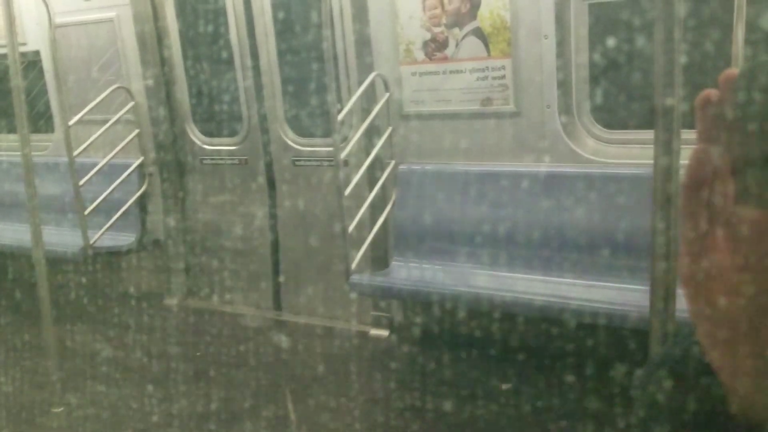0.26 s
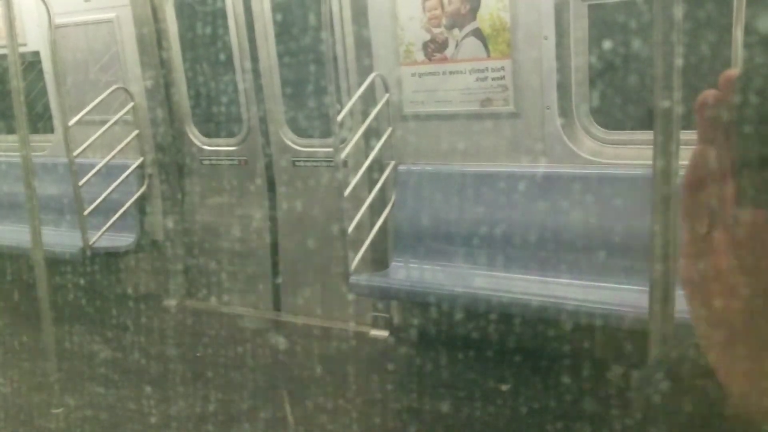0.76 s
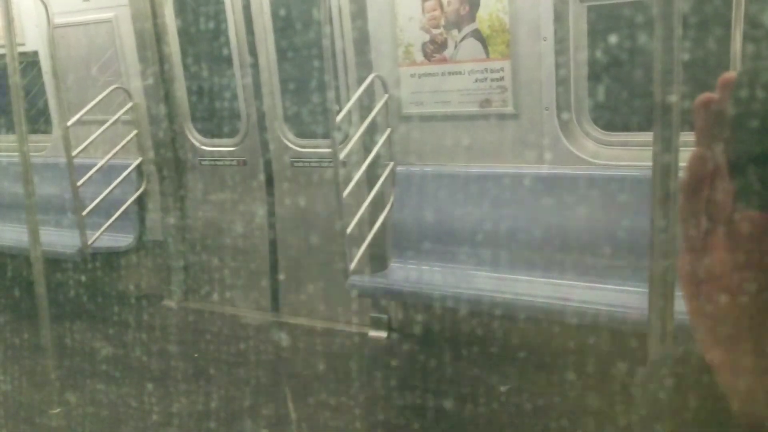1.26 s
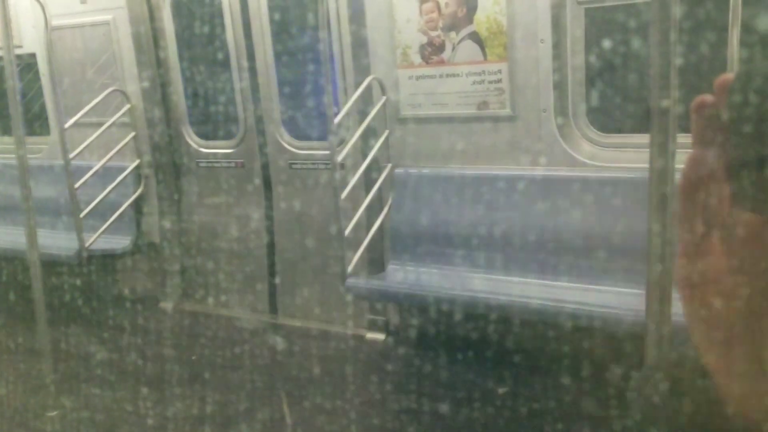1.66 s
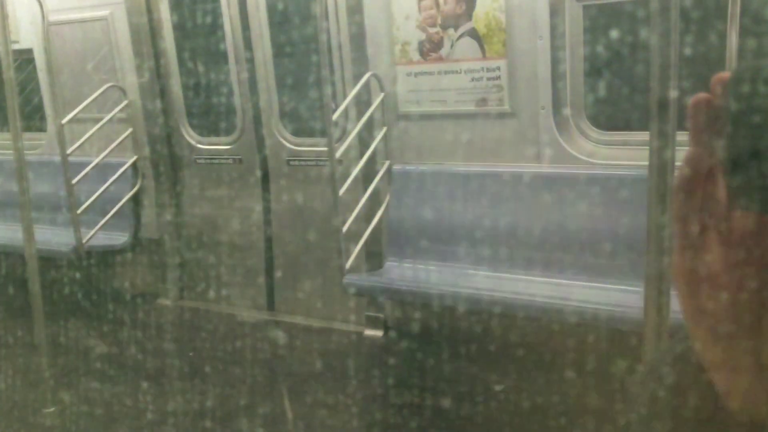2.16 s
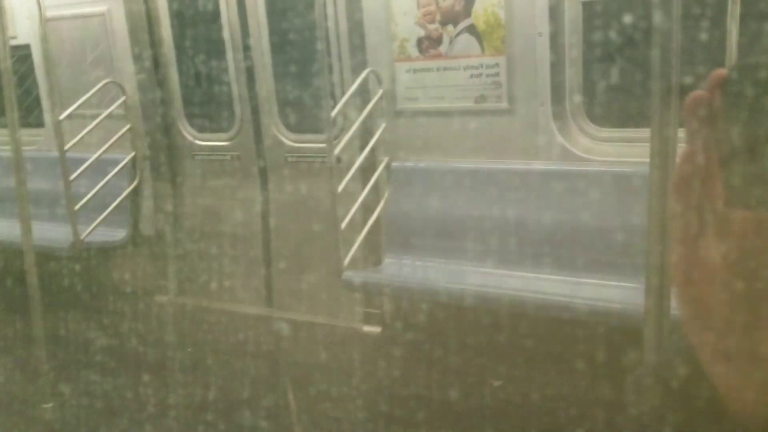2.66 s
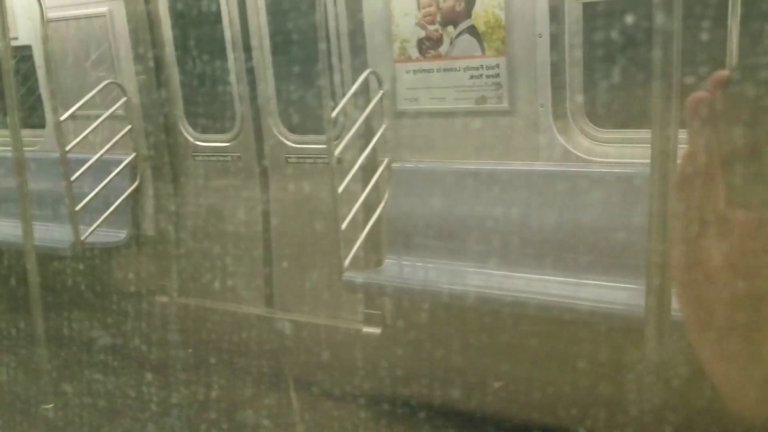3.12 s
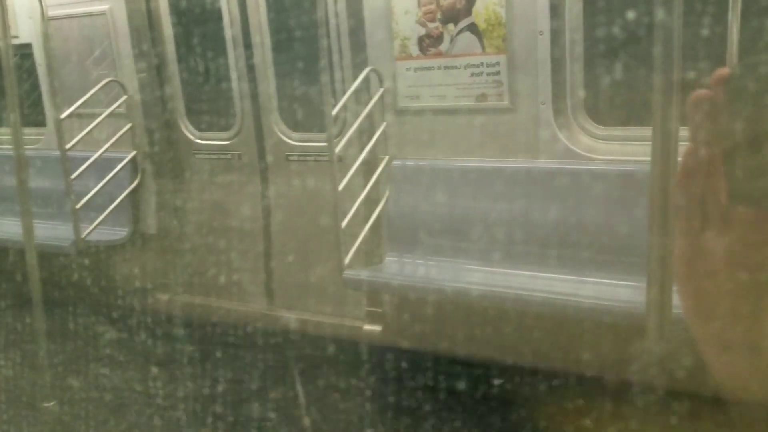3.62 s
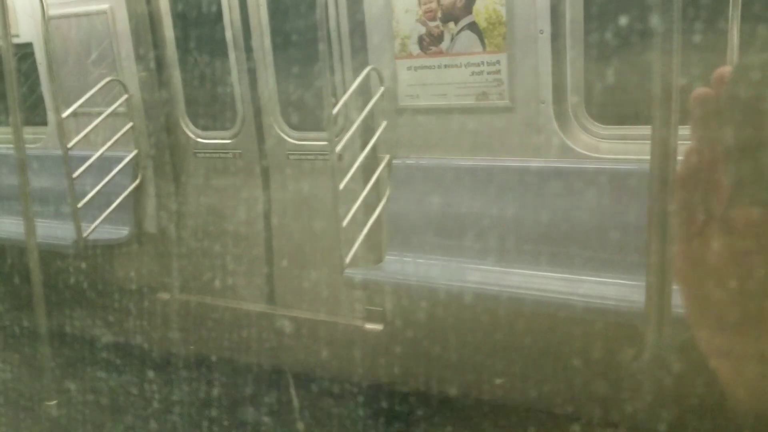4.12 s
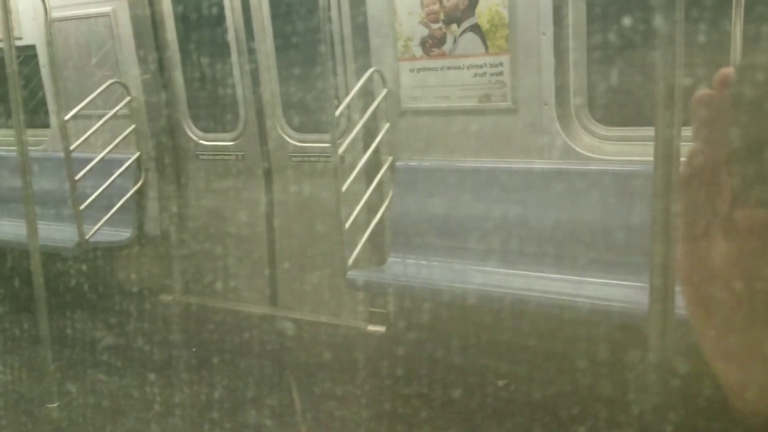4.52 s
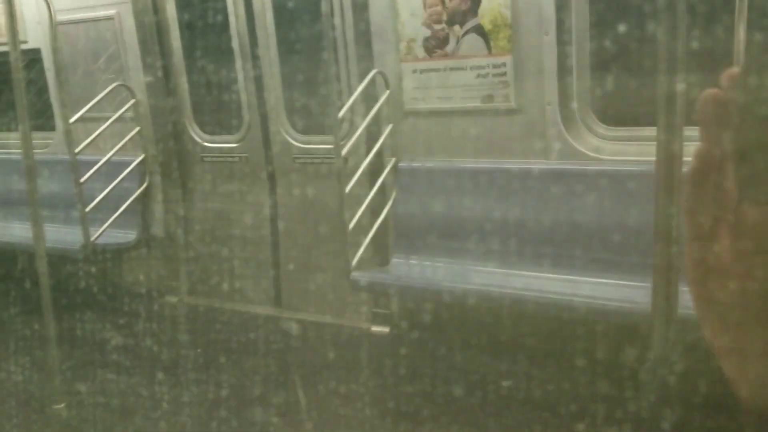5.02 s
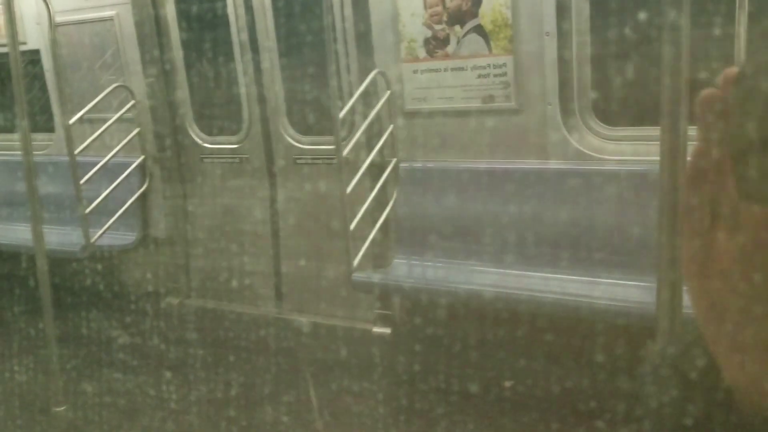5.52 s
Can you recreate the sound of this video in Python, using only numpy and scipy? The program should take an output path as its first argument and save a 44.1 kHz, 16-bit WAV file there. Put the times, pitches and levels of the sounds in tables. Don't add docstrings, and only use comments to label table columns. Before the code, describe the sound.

Continuous subway ride heard from within the cabin: bassy, uneven booming, grainy rolling noise and a low electric hum coming in short surges. Low jolts shake the car, the strongest near 2.4 and 3.8 seconds, the latter with a tight metallic clatter. Very faint, very high wheel squeaks touch the right side only. Wide stereo in the treble, bass centred, left side duller.

```python
import sys
import numpy as np
from scipy import signal
from scipy.fft import rfft, irfft
from scipy.io import wavfile
from scipy.ndimage import uniform_filter1d

SR = 44100
rng = np.random.default_rng(int(sys.argv[2]) if len(sys.argv) > 2 else 0)


def dump_mix(stems):
    frames = np.atleast_2d(stems).T
    limited = np.clip(frames, -1, 1)
    pcm = np.round(limited * 32767).astype(np.int16)
    wavfile.write(sys.argv[1], SR, pcm)


def voltage_ratio(level):
    return 10 ** (np.asarray(level, float) / 20)


N = 254898


def evened(x):
    return x / np.sqrt(np.mean(np.atleast_2d(x).mean(0) ** 2) + 1e-20)


def read(points, hz):
    f, value = np.transpose(points)
    return np.interp(np.log(hz + 1), np.log(f + 1), value)


def curve(points):
    times, values = np.transpose(points)
    return np.interp(np.arange(N) / SR, times, values)


def add(mix, s, sound):
    part = mix[..., round(s * SR):][..., :sound.shape[-1]]
    part += sound[..., :part.shape[-1]]


def resonate(x, hz, width_hz):
    turn = np.exp(2j * np.pi * np.cumsum(hz * np.ones(x.shape[-1])) / SR)
    r = np.exp(-np.pi * width_hz / SR)
    return 2 * (turn * signal.lfilter([1 - r], [1, -r], x / turn)).real


def drift(top_hz):
    t = np.arange(0, N, 256) / SR
    slow = np.zeros(len(t))
    for f in np.geomspace(.2, top_hz, num=20):
        slow += np.sin(2 * np.pi * (f * t + rng.random())) / np.sqrt(f)
    return np.interp(np.arange(N) / SR, t, evened(slow))


def struck(t, rise_s, t60_s):
    rise = np.sin(np.pi / 2 * np.clip(t / max(rise_s, 1e-4), 0, 1)) ** 2
    return rise * voltage_ratio(-60 * np.maximum(t - rise_s, 0) / t60_s)


def steadied(x, width_s):
    size = round(width_s * SR)
    swell = uniform_filter1d(uniform_filter1d(x.mean(0) ** 2, size), size)
    return evened(x / np.sqrt(swell + 0.071))


def ports(size):
    # (frequency [Hz], likeness [0-1])
    likeness = [(25, 0.88), (60, 1), (250, 0.94), (450, 0.83), (680, 0.52), (820, 0.4), (1100, 0.2),
                (1600, 0.19), (2200, 0.09), (2750, .45), (3500, 0), (5000, 0.02), (7000, 0.15)]
    # (frequency [Hz], lead [rad])
    phase_lead = [(0, 0), (900, -.9), (1400, -3.2), (2300, -3.6), (2600, -6.8), (3500, -8.4), (7000, -17)]
    hz = np.fft.rfftfreq(size, 1 / SR)
    a, b, c, d = rng.standard_normal((N // (size // 4) + 5, len(hz), 4)).T
    same = np.clip(read(likeness, hz), 0, 1)[:, None]
    turn = np.exp(1j * np.interp(hz, *np.transpose(phase_lead)))[:, None]
    right = a + 1j * b
    left = same * turn * right + np.sqrt(1 - same ** 2) * (c + 1j * d)
    return hz, np.array([left, right])


def rolling(lo_hz, hi_hz, size, patchy_db):
    # (frequency [Hz], density [dB per Hz])
    rail_colour = [(18, -17.5), (32, -4), (100, -2.5), (260, -4.5), (350, -11), (560, -12), (720, -18),
                   (2000, -22), (3050, -27.5), (3450, -37.5), (4400, -38.5), (4950, -44), (6300, -45),
                   (9000, -54), (9900, -56.5)]
    # (frequency [Hz], width [Hz], level [dB])
    car_modes = [(33, 10, 7), (59.3, 10, 4.5), (98, 21, 10), (130.5, 11, 9), (191.4, 20, 3.5),
                 (224.6, 15, 3), (246.5, 6.1, 2), (327, 11, 2.5), (423, 69, 2), (472, 36, 4),
                 (1464, 54, 5.5), (1980, 270, 1.5), (2727, 27, 8), (2876, 25, 8), (7050, 570, -8.5),
                 (8570, 1200, 5)]
    hz, z = ports(size)
    modes_db = sum(db / (1 + (2 * (hz - f) / w) ** 2) for f, w, db in car_modes)
    band = 1 / np.sqrt((1 + (lo_hz / (hz + 1)) ** 8) * (1 + (hz / hi_hz) ** 8))
    spectrum = band * voltage_ratio(read(rail_colour, hz) + modes_db)
    patches = uniform_filter1d(rng.standard_normal(z.shape[1:]), 12, axis=0)
    patches = uniform_filter1d(patches, 8, axis=1)
    z = z * spectrum[:, None] * voltage_ratio(patchy_db * patches / patches.std())
    return evened(signal.istft(z, nperseg=size, noverlap=size - size // 4)[1][:, :N])


def jolted(rest_db, index):
    # (time [s], boom level [dB], sway level [dB], spread [s])
    jolts = [(0.0, -25, -25, 0.13), (.42, -26, -37, 0.15), (.76, -19.5, -21, 0.097),
             (1.15, -13.5, -22, 0.049), (1.3, -21.5, -35, 0.037), (1.58, -22, -34.5, 0.084),
             (1.96, -26, -24, .06), (2.16, -20, -35, 0.078), (2.37, -15.5, -15, 0.058),
             (2.49, -17, -16, 0.059), (2.62, -28, -26, .05), (2.73, -20, -42, .08), (2.88, -19, -21.5, .05),
             (2.96, -18, -26, 0.045), (3.09, -22.5, -20.5, 0.04), (3.2, -22, -28, 0.066),
             (3.32, -19.5, -42, .04), (3.54, -20, -27.5, 0.06), (3.7, -17, -31, .09),
             (3.84, -11, -21, 0.046), (4.07, -34.5, -20.5, 0.15), (4.4, -26.5, -16.5, 0.079),
             (4.57, -22.5, -29, 0.2), (4.97, -17, -33, 0.041), (5.14, -19.5, -33, 0.094),
             (5.31, -18, -27, .06), (5.52, -15, -35, .06), (5.63, -17.5, -25.5, 0.045),
             (5.73, -18, -22.5, 0.042)]
    fall_db = 8.5
    t = np.arange(0, N, 64) / SR
    energy = voltage_ratio(2 * rest_db)
    for row in jolts:
        energy = energy + voltage_ratio(2 * (row[index] - fall_db * abs(t - row[0]) / row[3]))
    return np.interp(np.arange(N) / SR, t, np.sqrt(energy))


def train():
    # (time [s], level against the usual [dB])
    roughness = [(0, .5), (.5, 0.4), (.84, 0.5), (1.9, 0), (2.16, -1), (2.45, 0.5), (3.0, 0), (3.73, 1.5),
                 (3.88, 3), (3.94, -1), (4.36, -2.5), (4.89, -2.5), (4.96, -1.5), (5.34, 0.5), (5.72, 1),
                 (5.78, 2.5)]
    rough_db = curve(roughness)
    boom_gain = jolted(-26.5, index=1)

    deep = voltage_ratio(-29.5) * steadied(rolling(26, 41, size=8192, patchy_db=3.0), .3)
    sway = jolted(-37.5, index=2) * steadied(rolling(41, 78, size=8192, patchy_db=-2.5), 0.054)
    boom = boom_gain * steadied(rolling(78, 170, size=8192, patchy_db=3.2), 0.043)
    roar = steadied(rolling(172.0, 734, size=4096, patchy_db=0.6), 0.076)
    hiss = voltage_ratio(-30.5 + rough_db) * rolling(748, 13000, size=2048, patchy_db=0.8)
    flutter = voltage_ratio(0.42 * drift(40))

    roar_db = -19.5 + 0.66 * rough_db + 0.3 * drift(12)
    roar_gain = np.hypot(voltage_ratio(roar_db), voltage_ratio(-10) * boom_gain)
    return deep + sway + boom + roar_gain * roar + hiss * flutter


def load():
    # (start [s], hold [s], level of the third order [dB])
    surges = [(0.056, .08, -24), (.78, 0.11, -22.5), (1.05, .3, -24), (1.61, .01, -24), (1.76, 0.16, -25),
              (2.132, 0.13, -22), (2.95, 0.27, -25.5), (3.553, 0.24, -30), (3.95, .15, -31.5),
              (4.45, 0.017, -25), (4.8, .05, -24.5), (4.983, .05, -24), (5.42, 0.13, -29.5),
              (5.693, .1, -22.5)]
    pull_db_per_s, coast_db_per_s, idle_db, wobble_db = 88, 74.5, -41, 1.7
    t = np.arange(N) / SR
    ramps = []
    for s, hold, db in surges:
        pull = pull_db_per_s * np.maximum(s - t, 0)
        coast = coast_db_per_s * np.maximum(t - s - hold, 0)
        ramps.append(db - pull - coast)
    return voltage_ratio(np.maximum(np.max(ramps, axis=0), idle_db) + wobble_db * drift(15))


def motor():
    # (multiple of the shaft [1], level against the load [dB])
    orders = [(1, -9), (2, -10), (3, 1)]
    shaft_hz = 96.4
    turns = np.cumsum(shaft_hz * (1 + .003 * drift(6))) / SR
    hum = sum(voltage_ratio(db + 2.5) * np.sin(2 * np.pi * k * turns) for k, db in orders)
    return load() * hum


def squeaks():
    # (time [s], level [dB], frequency [Hz], fall [Hz], t60 [s])
    flange_squeaks = [(2.326, -48, 13170, 77, 0.36), (2.345, -54, 12920, 57, .45),
                      (2.36, -59, 12600, 0, .6), (3.63, -55, 12960, 60, 0.41), (3.76, -61, 12550, 0, .25),
                      (3.765, -60, 11700, 0, .2), (3.765, -60, 10900, 0, .2), (3.8, -57, 10000, 3, 0.61),
                      (.03, -65, 12600, 0, .3), (.03, -64, 11500, 0, .15), (.03, -64, 10300, 0, .15),
                      (1.6, -66, 12700, 2, .2), (1.79, -61, 12800, 100, .5), (1.81, -66, 13400, 0, .2),
                      (2.9, -68, 12500, 0, .2), (3.05, -65, 12200, 0, .3), (3.04, -65, 11400, 0, .2),
                      (3.04, -66, 13200, 0, .15), (4.42, -66, 11440, 0, .3), (5.39, -67, 11400, 0, .3)]
    out, t = np.zeros((2, N)), np.arange(SR // 3) / SR
    for s, db, hz, fall_hz, t60 in flange_squeaks:
        track = hz - fall_hz * np.clip(t / .15, 0, 1)
        whistle = resonate(rng.standard_normal(len(t)), track, 160)
        whistle = resonate(whistle, track, 160)
        add(out[1], s, voltage_ratio(db) * evened(whistle) * struck(t, .023, t60))
    return out


def clacks():
    # (time [s], level [dB], t60 [s], dullness [0-1])
    knocks = [
        (3.697, -18.5, 0.45, 0),
        (3.765, -22.5, 0.37, 0.4),
        (3.795, -24.5, 0.36, 0.6),
        (3.83, -31, .4, .6),
        (3.89, -34, .3, .5),
    ]
    # (frequency [Hz], width [Hz], level [dB])
    wheel_modes = [(1294, 300, -0.5), (1635, 430, 3), (1980, 400, -1), (2420, 190, 1), (2890, 460, 0),
                   (4340, 1800, -17.5)]
    out, t = np.zeros((2, N)), np.arange(SR // 2) / SR
    for s, db, t60, dull in knocks:
        noise = rng.standard_normal((2, len(t)))
        ring = np.zeros((2, len(t)))
        for f, w, mode_db in wheel_modes:
            dulled_db = mode_db - 12 * dull * np.log2(f / 1500)
            ring += voltage_ratio(dulled_db) * evened(resonate(resonate(noise, f, w), f, w))
        add(out, s, voltage_ratio(db - 5) * evened(ring) * struck(t, 0.0061, t60))
    door = signal.butter(6, 6200, fs=SR, output="sos")
    return signal.sosfilt(door, out) * voltage_ratio([[-3.5], [0]])


def thumps():
    # (time [s], level [dB], frequency [Hz], rise [s], t60 [s])
    joints = [(1.151, -12, 95.3, .015, 0.59), (2.33, -18, 45.8, .03, .3), (2.36, -20, 65, .03, 0.3),
              (2.419, -8, 98, .03, 0.45), (2.45, -24, 135, .03, 0.24), (3.7, -16, 137, .05, .6),
              (3.75, -15.5, 42.2, .04, .3), (3.78, -9.5, 63.2, .04, .5), (3.8, -9.5, 100, .04, 0.72),
              (3.821, -13.5, 149.6, .03, 0.3), (4.38, -12, 97, .02, 0.17), (5.319, -18, 110, .03, 0.57)]
    stiffening = .8
    out, t = np.zeros(N), np.arange(SR // 2) / SR
    for s, db, hz, rise, t60 in joints:
        cycles = hz * (t + stiffening * (t - rise) ** 2 / 2)
        add(out, s - rise, voltage_ratio(db) * struck(t, rise, t60) * np.sin(2 * np.pi * cycles))
    return out


def scene():
    return train() + motor() + squeaks() + clacks() + thumps()


def gated(x):
    # (frequency [Hz], threshold [dB])
    gate_points = [(5500, -92), (6600, -88), (7050, -83.5), (7500, -86), (9300, -83.2), (13000, -83.2)]
    how = dict(window="cosine", nperseg=2048, noverlap=1024)
    hz, _, z = signal.stft(x, SR, **how)
    group = np.sqrt(abs(uniform_filter1d(abs(z) ** 2, size=8, axis=1)))
    treble = group[1, (hz > 7500) & (hz < 9000)].mean(0)
    treble = uniform_filter1d(treble, size=5)
    threshold = voltage_ratio(read(gate_points, hz))[:, None] * treble / treble.mean()
    return signal.istft(z * (group > threshold), SR, **how)[1][:, :N]


def top_cut(x):
    return signal.sosfilt(signal.butter(12, 14000, fs=SR, output="sos"), x)


def record(dry):
    # (frequency [Hz], level [dB])
    left_muffle = [(60, 0.5), (400, 0.5), (560, -3), (750, 1), (1100, -4), (2000, -3.5), (3000, -5),
                   (3500, -3.5), (4500, -8), (6000, -9), (6600, -13), (7050, -15)]
    both = signal.sosfilt(signal.butter(2, 24., "high", fs=SR, output="sos"), dry)
    both = both * signal.windows.tukey(N, .006 * SR / N)
    both = both / (1 + abs(both) ** 6) ** (1 / 6)
    hz = np.fft.rfftfreq(N, 1 / SR)
    left_quiet_hz = 7200
    left = irfft(rfft(both[0]) * voltage_ratio(read(left_muffle, hz)) * (hz < left_quiet_hz), N)
    mix = gated(np.array([left, both[1]]))
    return top_cut(mix)


dry = scene()
out = record(dry)
dump_mix(out)
```